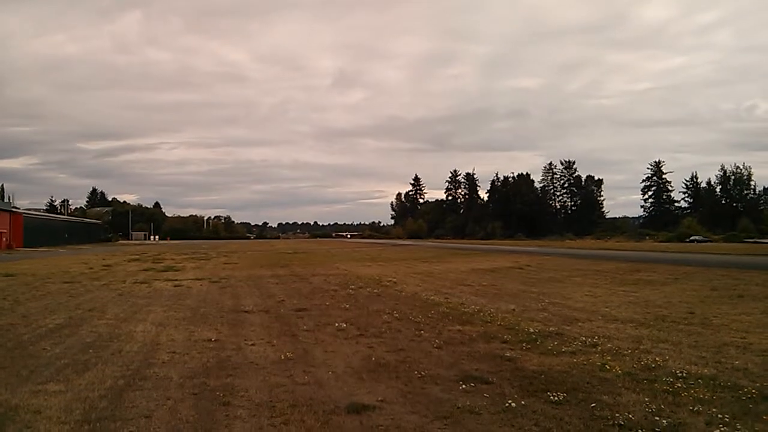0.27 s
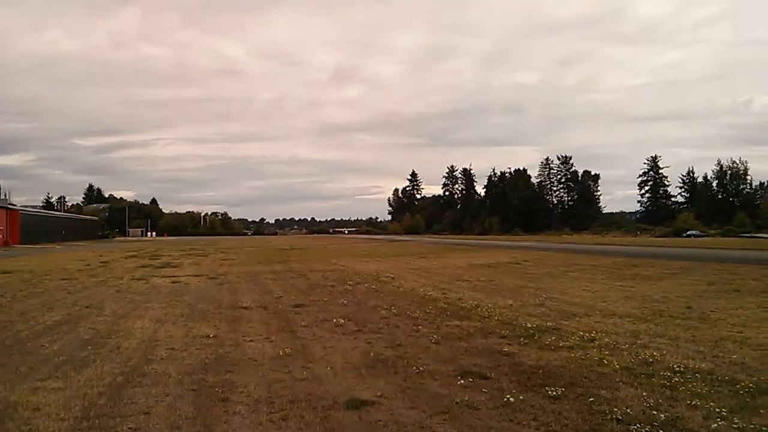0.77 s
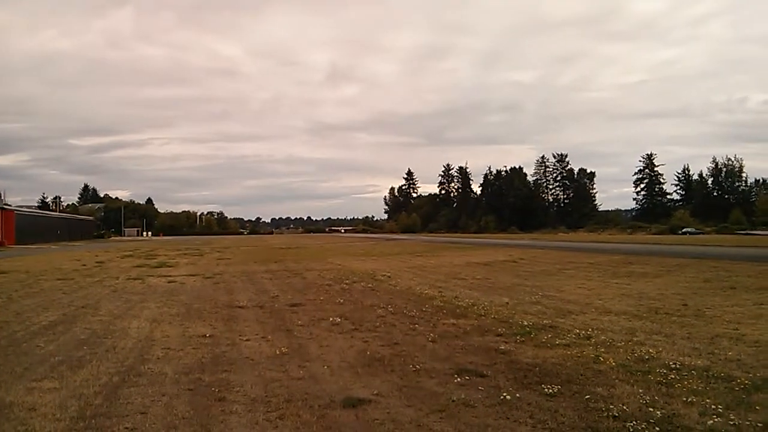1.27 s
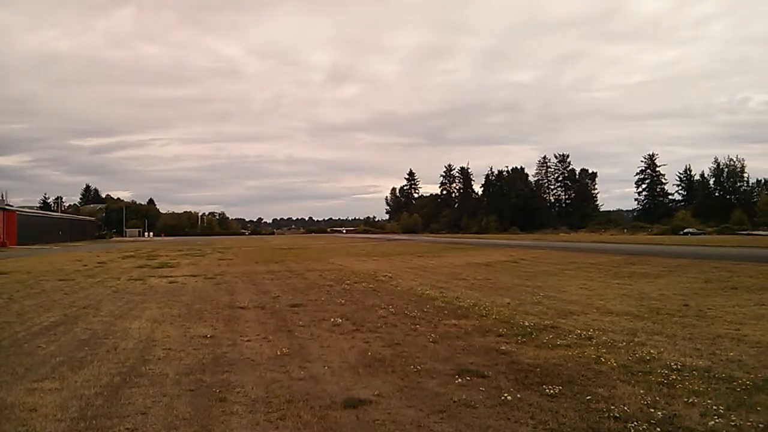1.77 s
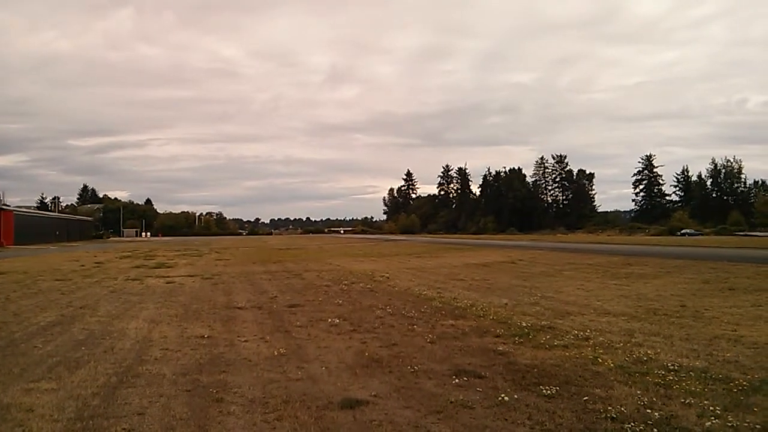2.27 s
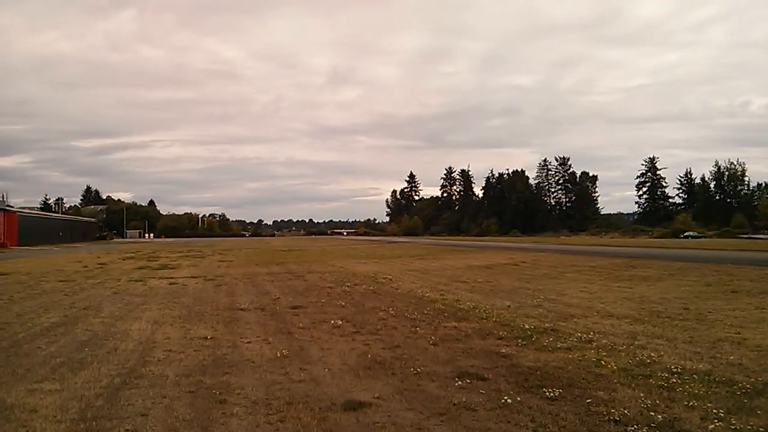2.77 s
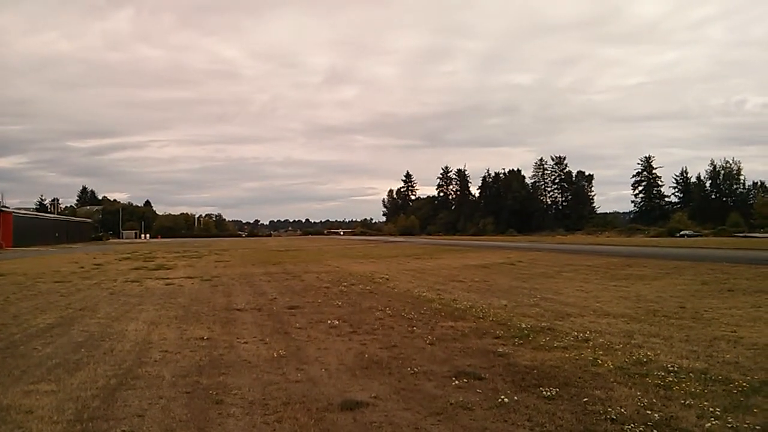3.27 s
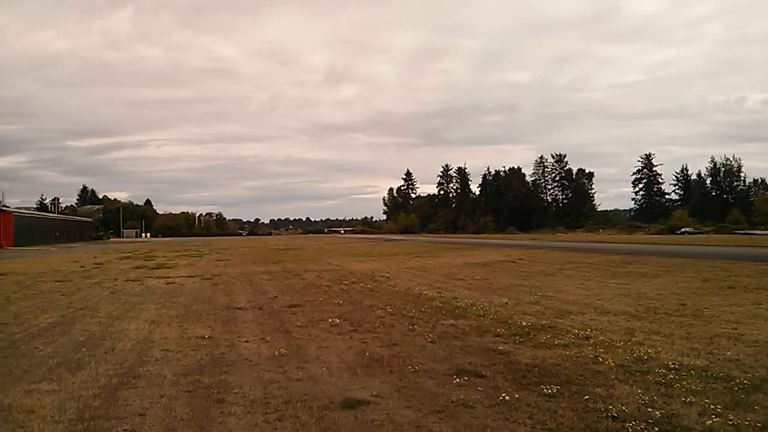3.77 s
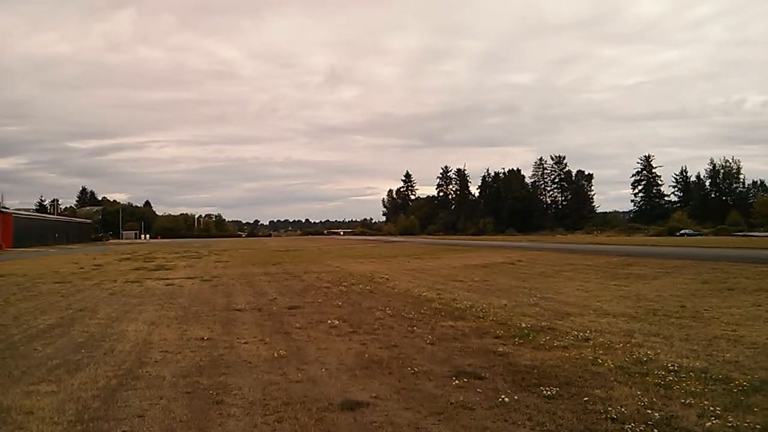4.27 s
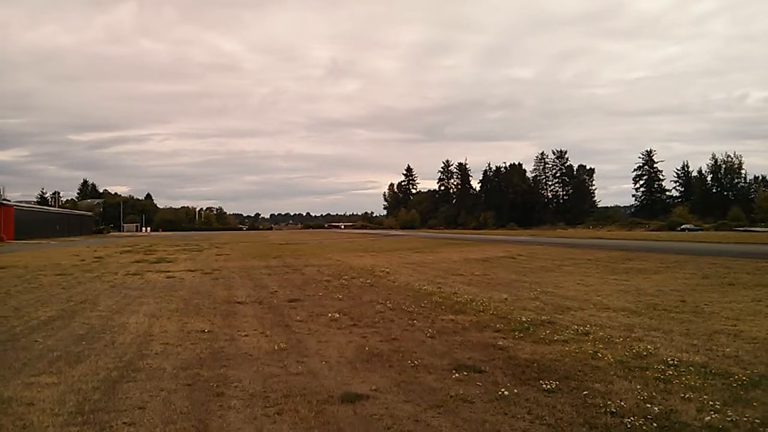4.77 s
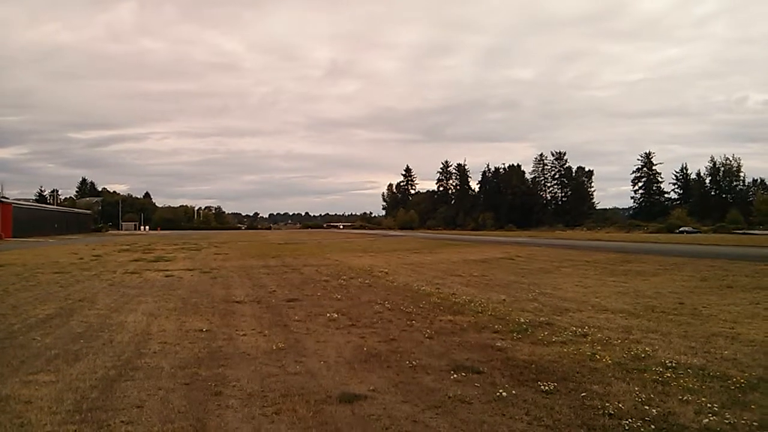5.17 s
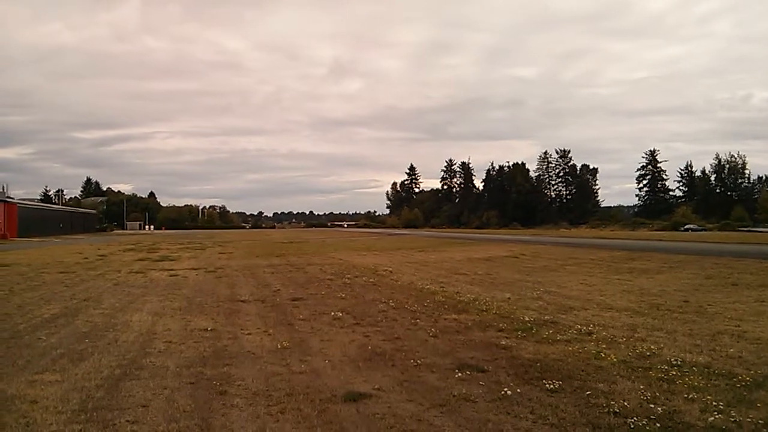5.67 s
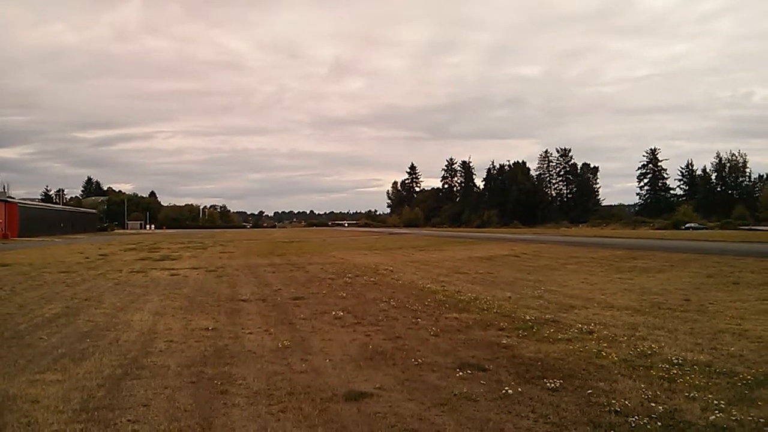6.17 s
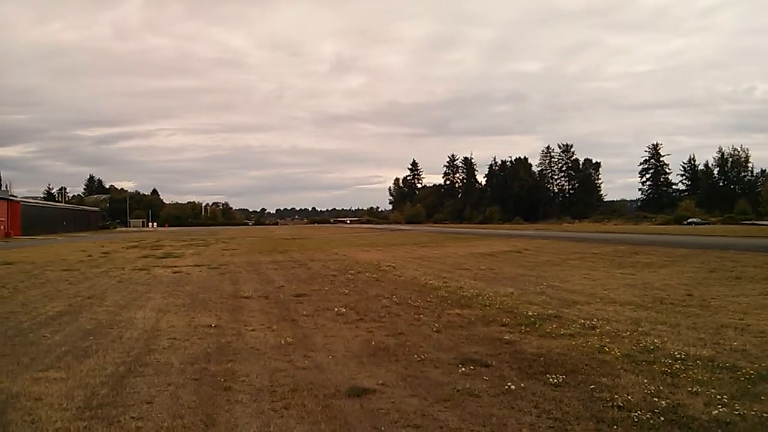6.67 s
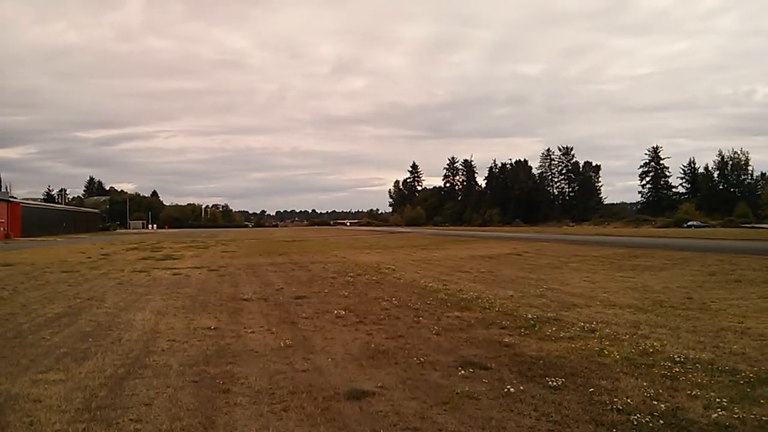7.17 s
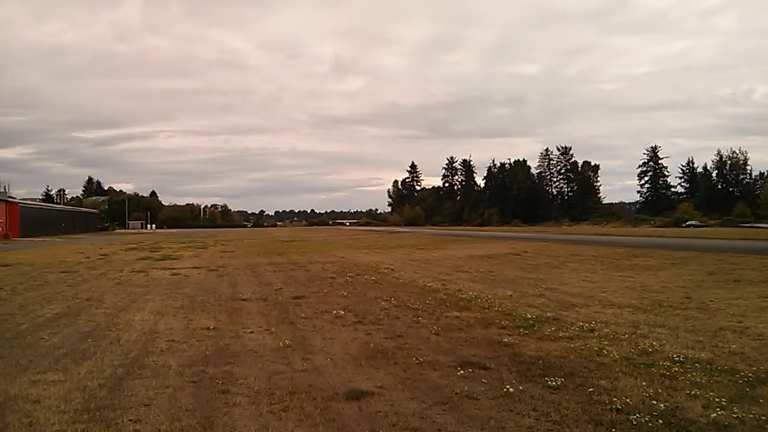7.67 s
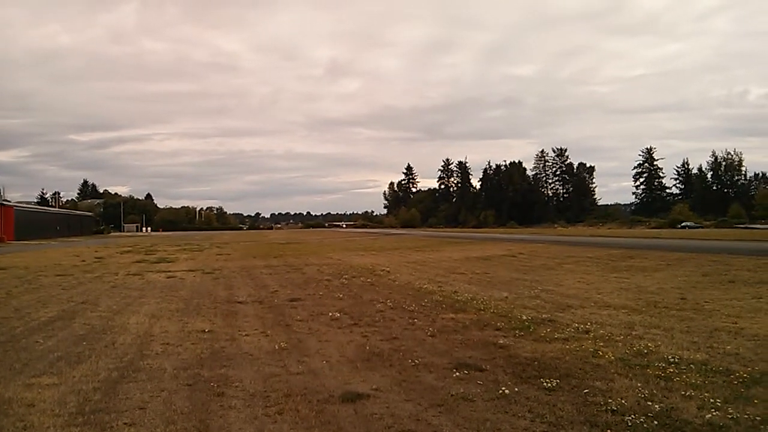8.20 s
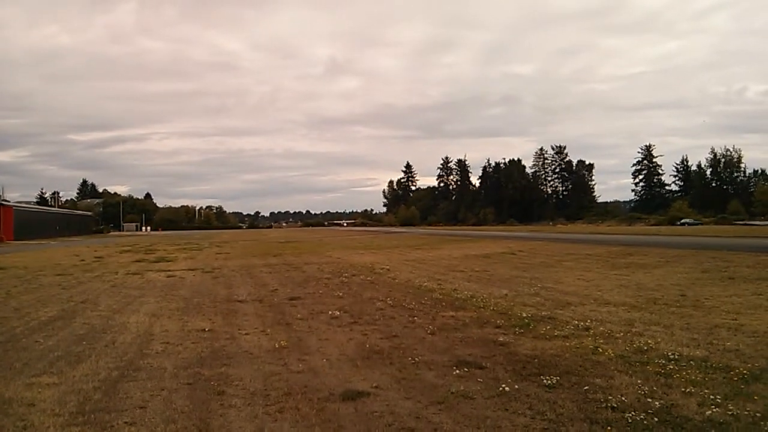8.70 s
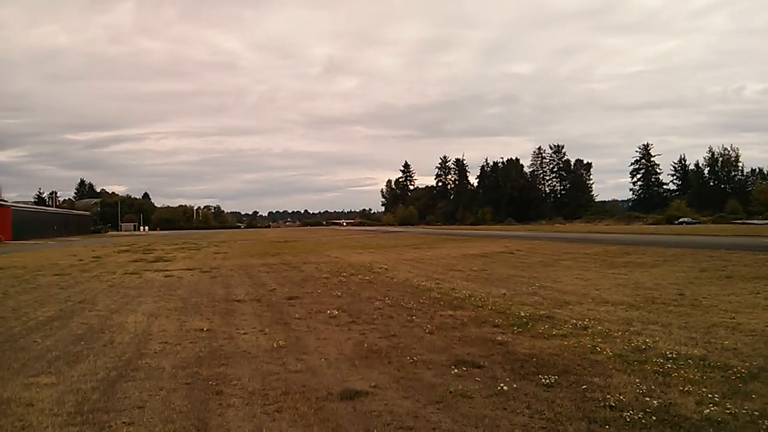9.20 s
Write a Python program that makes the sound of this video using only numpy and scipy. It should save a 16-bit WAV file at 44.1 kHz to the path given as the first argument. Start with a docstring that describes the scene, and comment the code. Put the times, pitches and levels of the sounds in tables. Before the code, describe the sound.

A light aircraft engine idles with a burble while a small bird chirps, then throttles up to a loud, buzzing propeller roar.

```python
"""A light aircraft with a geared two-stroke engine idles on a grass airfield: the exhaust burbles, the
crankcase clatters and a hangar wall echoes the deep tones. A small bird calls in threes of falling
chirps, and a farther one twitters. From about 4.6 s the engine speeds up and the gears knock and chatter.
Then the propeller's hiss, cracks and buzz take over, reaching full speed at about 8 s.
Near 9 s the aircraft starts to roll, and its roar grows."""
import sys
import numpy as np
from scipy import signal
from scipy.fft import rfft, irfft, next_fast_len
from scipy.io import wavfile
from scipy.ndimage import uniform_filter1d, map_coordinates

SR = 44100
rng = np.random.default_rng(int(sys.argv[2]) if len(sys.argv) > 2 else 0)


def wrap_up_sound(samples):
    """Save the sound to the file named by the first command line argument, as 16-bit audio."""
    columns = np.atleast_2d(samples).T
    # keep every value between -1 and 1, then stretch to whole-number steps
    tamed = np.clip(columns, -1, 1)
    steps = np.round(tamed * 32767).astype(np.int16)
    wavfile.write(sys.argv[1], SR, steps)


N = 416304
TIME = np.arange(N) / SR
# Engine speed is counted in firings a second. Over these spans the gears take up load and the blades bite.
DRIVE_HZ, BITE_HZ = (59, 68.5), (94.5, 120.5)
FULL_SPEED_HZ = 211


def gain_of(db):
    """Turns decibels into a number to multiply by."""
    return 10 ** (np.asarray(db) / 20)


def evened(x):
    """Scales x to an average strength (rms) of 1."""
    return x / np.sqrt(np.mean(x ** 2) + 1e-20)


def curves(rows):
    """Draws each column of a timed table as a curve with rounded corners."""
    s, *columns = np.transpose(rows)
    return [uniform_filter1d(np.interp(TIME, s, c), size=300) for c in columns]


def coloured(x, points):
    """Shapes the bass and treble of x by (frequency [Hz], level [dB]) points, at strength 1."""
    hz, db = np.transpose(points)
    size = next_fast_len(N)
    shape = np.interp(np.log(np.fft.rfftfreq(size, 1 / SR) + 1), np.log(hz), db)
    return evened(irfft(rfft(x, size) * gain_of(shape), size)[:N])


def drift(per_s):
    """A smooth random wobble of strength 1 that changes about per_s times a second."""
    knots = rng.standard_normal(4096)
    coarse = np.arange(0, N + 64, 64) / SR
    wobble = map_coordinates(knots, [coarse * per_s], order=3, mode="wrap")
    return evened(np.interp(TIME, coarse, wobble))


def tone(turns):
    """A pure tone of strength 1, one wave per turn, starting anywhere in its wave."""
    return np.sqrt(2) * np.sin(2 * np.pi * (turns + rng.random()))


def bursts(turns, length, uneven_db):
    """A puff of noise in each turn, fading over a share of it; no two are equally strong."""
    strength = gain_of(uneven_db * rng.standard_normal(4096))[turns.astype(int)]
    return strength * np.exp(-(turns % 1) / length) * rng.standard_normal(N)


def swells(rows):
    """Sudden rises that die away, from (time [s], level [dB], fade time [s]) rows."""
    return sum(gain_of(db) * np.clip((TIME - s) / .0052, 0, 1) * np.exp(-abs(TIME - s) / fade)
               for s, db, fade in rows)


def by_speed(firing_hz, full_db, doubling_db):
    """A gain that grows by doubling_db each time the speed doubles, up to full_db at full speed."""
    return gain_of(full_db + doubling_db * np.log2(firing_hz / FULL_SPEED_HZ))


def engaged(firing_hz, span_hz):
    """Rises from 0 to 1 as the speed crosses a span."""
    return np.interp(firing_hz, span_hz, [0, 1])


def exhaust(firing, firing_hz, effort_db):
    """The firings make a few low tones; the pipe favours some pitches and the muffler cuts high ones."""
    # how well the pipe passes each pitch: (frequency [Hz], level [dB])
    pipe = [(60, -64), (104, -59), (119, -45), (140, -39.5), (180, -33), (205, -34), (240, -37.5),
            (290, -33.5), (345, -39), (390, -41.5), (425, -33)]
    # the tones in a firing pulse: (multiple of the firing rate, relative level [dB])
    pulse = [(1, 0.5), (2, -12), (3, -23), (4, -37.5), (5, -33)]
    muffle_hz, muffle_db_per_octave = 292, -48
    hz, db = np.transpose(pipe)
    wander_db = np.interp(firing_hz, [60, 100], [1.58, 1.1])  # steadier at speed
    strength_db = effort_db + wander_db * drift(7) + .7 * drift(35)
    out = np.zeros(N)
    for k, pulse_db in pulse:
        level_db = strength_db + pulse_db + np.interp(np.log(k * firing_hz), np.log(hz), db)
        muffled_db = (k > 2) * muffle_db_per_octave * np.maximum(np.log2(k * firing_hz / muffle_hz), 0)
        out += gain_of(level_db + muffled_db + wander_db * drift(12)) * tone(k * firing)
    return out


def wall_echo(x):
    """A hangar wall returns x late, dull and upside down, so tones swell and cancel as they climb."""
    delay_s, echo_db = .047, -3.5
    dulled = uniform_filter1d(x, size=66)
    return x - gain_of(echo_db) * np.interp(TIME - delay_s, TIME, dulled, left=0)


def burble(firing, uneven_db):
    """Uneven firings and rushing gas thump through the muffler."""
    # what the muffler lets through: (frequency [Hz], relative level [dB])
    muffler = [(20, -21), (40, -31), (65, -15.5), (100, -3.5), (150, 0.5), (210, -7), (260, -16.5),
               (300, -10), (370, -28.5), (520, -52), (1000, -54)]
    kicks = np.zeros(N)
    fired_at = np.flatnonzero(np.diff(np.floor(firing)))
    kicks[fired_at] = rng.uniform(-.61, 1, 4096)[:len(fired_at)] * np.sqrt(np.gradient(fired_at))
    gas = evened(kicks) + rng.standard_normal(N)
    return gain_of(uneven_db) * evened(wall_echo(coloured(gas, muffler)))


def ring(x, notes):
    """Metal shaken by x rings at its own notes, each swelling by itself; neighbours swing opposite ways."""
    out = np.zeros(N)
    for k, (hz, width, db) in enumerate(notes):
        b, a = signal.iirpeak(hz, hz / (1.5 * width), SR)
        ringing = signal.lfilter(b, a, signal.lfilter(b, a, x))
        out += (-1) ** k * gain_of(db + 1.5 * drift(8)) * ringing
    return evened(out)


def crankcase(firing, firing_hz):
    """Each firing rattles the engine's metal case."""
    # the notes of the case: (frequency [Hz], width [Hz], relative level [dB])
    case_notes = [(430, 63, -11.5), (651, 79.5, -1), (910.4, 77, 2.5), (1203, 66, -4), (1349, 89, -7),
                  (1740, 75, -10), (1910, 98, -12), (2116, 91, -16.5)]
    clatter = ring(bursts(firing, length=1.0, uneven_db=1.4), case_notes)
    return by_speed(firing_hz, full_db=-49.5, doubling_db=7.78) * clatter


def field():
    """Quiet open air with a low rumble, and a few dry rustles close by."""
    # the tone of the open air: (frequency [Hz], relative level [dB])
    air_colour = [(20, 22.5), (50, 36), (90, 38), (200, 15), (400, 0), (1500, 11.5), (2400, -0.5),
                  (3200, -9.5), (4600, 5.5), (5600, 3.5), (6500, 0.5), (7100, 3), (8000, -0.5),
                  (11000, -2.5), (15500, -3)]
    # faint rustles: (time [s], level [dB], fade time [s])
    rustles = [(.255, -70, 0.028), (1.531, -73, .03), (1.9, -75, 0.082), (2.04, -69.5, .07),
               (2.81, -78, .015), (3.33, -81, .1)]
    rustle_colour = [(3000, -32), (6000, -5), (7700, 10), (9500, 3), (15000, -15)]
    air = gain_of(-60.5) * coloured(rng.standard_normal(N), air_colour)
    return air + swells(rustles) * coloured(rng.standard_normal(N), rustle_colour)


def chirp(s, top_hz, db, fall_hz):
    """One short quavering whistle that bends down."""
    t = np.arange(-1100, 1100) / SR
    fall = np.clip((t + .0112) / .023, 0, 1.3) ** 2
    quaver = evened(uniform_filter1d(rng.standard_normal(len(t)), 60))
    hz = top_hz * (1 + .007 * rng.standard_normal()) - fall_hz * fall + 45 * quaver
    note = gain_of(db) * np.exp(-(t / .0095) ** 2) * np.sin(2 * np.pi * np.cumsum(hz) / SR)
    start = max(round((s + t[0]) * SR), 0)
    return np.pad(note, (start, N - start - len(note)))


def birds():
    """A near bird chirps in threes; a farther one is softened as trees scatter its sound."""
    # the near bird's calls: (time of the middle chirp [s], relative level [dB])
    calls = [(0.12, -58.5), (.625, -58.5), (1.118, -58.5), (1.687, -57.5), (2.208, -56.5), (2.678, -57),
             (3.253, -57.5), (3.838, -58), (4.367, -57), (4.938, -57), (5.701, -56), (6.331, -58)]
    # one call: (time from the middle chirp [s], top pitch [Hz], relative level [dB])
    chirps = [(-.046, 4500, -6), (0, 4650, 0), (.051, 4650, 0)]
    # the far bird's clearest notes: (time [s], top pitch [Hz], relative level [dB])
    twitter = [(.97, 4650, -61), (1.95, 4900, -65), (2.02, 4870, -63), (3.371, 5100, -66),
               (4.68, 4840, -59), (4.73, 5000, -66)]
    near = sum(chirp(s + offset, hz, db + chirp_db, fall_hz=405)
               for s, db in calls for offset, hz, chirp_db in chirps)
    # its softer notes come at random until the engine speeds up
    soft = [(4.7 * abs(when), 5080 + 640 * pitch, -67.5) for when, pitch in rng.uniform(-1, 1, (14, 2))]
    far = .5 * sum(chirp(s, hz, db, fall_hz=150) for s, hz, db in twitter + soft)
    tail = rng.standard_normal(SR // 2) * gain_of(-60 * TIME[:SR // 2] / .3)
    scatter = signal.fftconvolve(gain_of(-9) * near + far, tail / np.linalg.norm(tail))[:N]
    return gain_of(-1.5) * near + far + scatter


def gearbox(firing, firing_hz):
    """Slack between the gear teeth rings the gearbox; the teeth knock as they take up load."""
    # the notes of the gearbox: (frequency [Hz], width [Hz], relative level [dB])
    gear_notes = [(5335, 194, 6), (5550, 28, 11.5)]
    # knocks of the teeth: (time [s], level [dB])
    knocks = [(5.08, -59), (5.15, -63), (5.25, -58.5), (5.3, -60), (5.355, -60.5), (5.405, -61),
              (5.45, -63)]
    sing_hz, sing_width_hz, sing_db = 91, 5.2, 5  # the box sings as the engine passes this speed
    ringing = ring(bursts(firing, length=.7, uneven_db=1), gear_notes)
    sing = gain_of(sing_db * np.exp(-((firing_hz - sing_hz) / sing_width_hz) ** 2))
    load = gain_of(-23.5) + engaged(firing_hz, DRIVE_HZ)
    chatter = by_speed(firing_hz, full_db=-56.5, doubling_db=10.7) * sing * load * ringing
    tooth_colour = [(2500, -18), (4500, -26), (5900, -3), (7500, -20), (8800, -18), (10500, -27)]
    teeth = coloured(rng.standard_normal(N), tooth_colour)
    return chatter + swells([(s, db, .028) for s, db in knocks]) * teeth


def churned_air(firing, blade, firing_hz):
    """Each blade tears off a puff of air; flutter and swish turn to roar, hiss and whine with speed."""
    # the air's low and high sounds, slow and then fast: (frequency [Hz], relative level [dB])
    flutter_colour = [(150, -10), (300, 10.5), (520, -49), (680, 6.5), (790, -7), (930, -3), (1080, -6.5),
                      (1260, 10), (1400, -4.5), (1560, -64), (1950, -9), (2400, -54), (4000, -56)]
    swish_colour = [(1500, -36), (2400, -16), (2950, -6.5), (3250, -8.5), (3650, -8), (4050, -0.5),
                    (4550, -11.5), (4900, -11), (5500, -1), (6200, -5), (7000, -11), (7800, -13.5),
                    (9200, -12.5), (10500, -21.5), (15500, -31)]
    roar_colour = [(150, -21), (300, -1), (450, -15), (620, -3.5), (900, 2.5), (1050, 2.5), (1280, -3),
                   (1500, -8), (1900, -4), (2200, -15), (2450, -23), (4000, -43.5)]
    hiss_colour = [(1410, -53), (2400, -15), (2960, -0.5), (3180, -8), (3330, -2.5), (3600, -5.5),
                   (4110, -0.5), (4960, -1.5), (5360, 2), (6120, 6), (7380, -4.5), (7920, -11),
                   (9410, -11.5), (11200, -34), (15500, -49)]
    # the thin whine of the drive: (multiple of the firing rate, level against the hiss [dB])
    whine_tones = [(14.22, -28), (25, -20), (26, -14), (28.42, -20), (31, -25), (40, -30), (44, -32),
                   (45, -32)]
    bite, fast = engaged(firing_hz, BITE_HZ), engaged(firing_hz, span_hz=(120, 187))
    puffs = evened(bursts(blade, length=.22, uneven_db=1.5)) + 1.2 * rng.standard_normal(N)
    flutter = (gain_of(-12.5) + bite) * coloured(puffs, flutter_colour)
    roar = (1 - fast) * flutter + fast * coloured(puffs, roar_colour)
    rush = (1 + .11 * np.cos(2 * np.pi * blade)) * gain_of(.5 * drift(45)) * rng.standard_normal(N)
    swish = gain_of(-8.5 + 2.8 * bite) * coloured(rush, swish_colour)
    hiss = (1 - fast) * swish + fast * coloured(rush, hiss_colour)
    whine = sum(gain_of(db + 1.5 * drift(6)) * tone(k * firing + .1 * drift(60)) for k, db in whine_tones)
    full_power = engaged(firing_hz, span_hz=(190, FULL_SPEED_HZ))
    low = by_speed(firing_hz, full_db=-40.5, doubling_db=14.26) * rolling() ** .6 * roar
    high = by_speed(firing_hz, full_db=-41.5, doubling_db=14.25) * (hiss + full_power * whine)
    return engaged(firing_hz, DRIVE_HZ) * (low + high)


def blade_cracks(blade, firing_hz):
    """Each blade cracks through the wake of the one before, harder while gathering speed."""
    crack_colour = [(300, -22), (520, -9), (700, -2.5), (1000, -10), (1300, 4.5), (1550, -7),
                    (1900, -9.5), (2450, -60), (5000, -48)]
    pulse = np.exp(-((blade % 1 - .02) / .005) ** 2) * gain_of(1.5 * drift(25))
    puff = bursts(blade, length=.05, uneven_db=.9)
    cracks = .5 * gain_of(-1.5) * evened(pulse - pulse.mean()) + gain_of(-3) * evened(puff)
    spin_up_hz_per_s = uniform_filter1d(np.gradient(firing_hz) * SR, size=8000)
    bite = engaged(firing_hz, BITE_HZ) * by_speed(firing_hz, full_db=-45.5, doubling_db=38)
    return bite * gain_of(.1921 * spin_up_hz_per_s) * coloured(cracks, crack_colour)


def propeller_thrust(firing, blade, firing_hz, effort_db):
    """The blades push the air in two deep tones, and make more by chopping the exhaust stream."""
    # chopped tones: (multiple of the firing rate, multiple of the blade rate, relative level [dB])
    chopped_tones = [(.5, 1, -5.5), (.5, 2, -12.5), (1, 1, -7), (2.5, 0, -25.5)]
    push = engaged(firing_hz, span_hz=(113, 123)) * gain_of(effort_db)
    first = push * by_speed(firing_hz, full_db=-40.5, doubling_db=22)
    second = push * by_speed(firing_hz, full_db=-37, doubling_db=15)
    deep = first * gain_of(.5 * drift(8)) * tone(blade)
    deep += second * gain_of(.36 * drift(7.1)) * tone(2 * blade)
    chopped = sum(gain_of(db + 2.6 * drift(10)) * tone(f * firing + b * blade)
                  for f, b, db in chopped_tones)
    return wall_echo(deep) + first * chopped


def propeller_buzz(blade, firing_hz):
    """Sharp blade slaps blend into a buzz whose tones fade in and out in the gusty air."""
    # the tones in a slap: (multiple of the blade rate, relative level [dB])
    slap_tones = [(3, -2), (4, -19), (5, -23), (6, -14.5), (7, -12), (8, -1), (9, 0), (10, 1.5), (11, -2),
                  (12, -12.5), (13, -7), (14, -2.5), (15, -4), (16, 0.5), (17, -7.5), (18, -7), (19, -8),
                  (20, -6), (21, -7), (22, -7), (23, -12), (24, -11), (25, -33.5), (26, -28), (27, -19)]
    slap, roll = np.zeros(N), rolling()
    for k, db in slap_tones:
        phase = .8 * rng.standard_normal() + .15 * drift(9)
        strength = roll ** (k / 14) * gain_of(db + 2.8 * drift(5))
        slap += strength * np.cos(2 * np.pi * k * blade + phase)
    uneven = 1 + .1 * np.cos(np.pi * blade)  # the two blades never bite quite alike
    level = by_speed(firing_hz, full_db=-34, doubling_db=46) * gain_of(.8 * drift(30))
    return level * evened(uneven * slap)


def rolling():
    """A gain that grows once the aircraft moves, lifting the roar and brightening the buzz."""
    start_s, db_per_s = 8.92, 5
    return gain_of(db_per_s * np.maximum(TIME - start_s, 0))


def scene():
    """One shaft speed drives the engine and, through the gears, the propeller."""
    # engine speed: (time [s], firing rate [Hz])
    speed = [(0.0, 57.9), (0.5, 59.24), (1.0, 60.98), (1.8, 59.05), (3.3, 60.7), (3.9, 59.58), (4.63, 61.5),
             (4.85, 68.0), (5.45, 84.2), (5.9, 96.6), (6.2, 103.66), (6.5, 119.48), (6.8, 136.58),
             (7.1, 150.41), (7.4, 171.19), (7.65, 191.43), (7.8, 200.31), (8.05, 207.4), (8.35, 210.5),
             (9.44, 211.7)]
    # the engine hesitates as the throttle opens, stumbles, sags, then pulls:
    # (time [s], firing strength [dB], burble level [dB])
    effort = [(0, -2.5, -51.5), (.55, -2, -57.5), (.8, 0, -54.5), (4.62, 2.5, -56.5), (4.72, -2, -61),
              (4.82, 3, -53), (5.3, 0.5, -45), (5.53, -1.5, -54), (5.68, 0.5, -53.5), (5.95, -8, -59.5),
              (6.5, -7, -55.5), (6.85, -4, -47.5), (7.3, 0, -41.5), (7.95, 2, -42), (8.5, -3.5, -43),
              (9.44, -1.5, -44.5)]
    firings_per_blade = 2.6
    firing_hz = curves(speed)[0] + .08 * drift(18)
    effort_db, uneven_db = curves(effort)
    firing = np.cumsum(firing_hz) / SR  # firings so far
    blade = firing / firings_per_blade  # blade passes so far
    engine = wall_echo(exhaust(firing, firing_hz, effort_db)) + burble(firing, uneven_db)
    engine += crankcase(firing, firing_hz) + gearbox(firing, firing_hz)
    propeller = propeller_thrust(firing, blade, firing_hz, effort_db) + propeller_buzz(blade, firing_hz)
    propeller += churned_air(firing, blade, firing_hz) + blade_cracks(blade, firing_hz)
    return (engine + propeller + birds() + field())[None]


def record(dry):
    """Cuts away the very highest treble."""
    treble_cut = signal.firwin(511, cutoff=15750, window=("kaiser", 9), fs=SR)
    return signal.oaconvolve(dry, treble_cut[None], "same")


dry = scene()
out = record(dry)
wrap_up_sound(out)
```